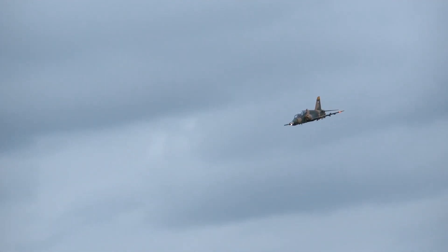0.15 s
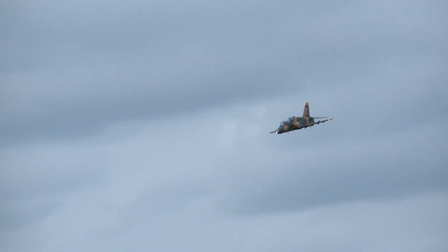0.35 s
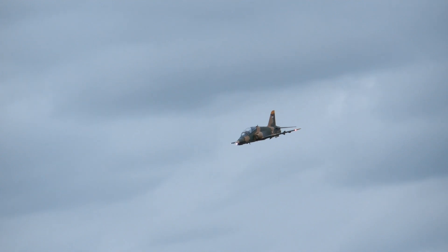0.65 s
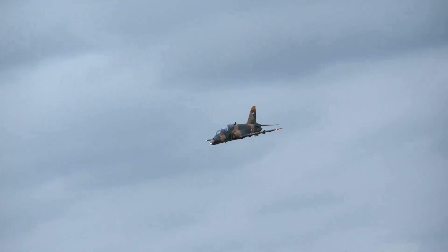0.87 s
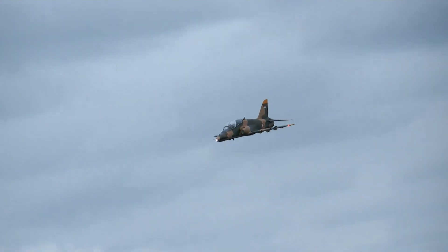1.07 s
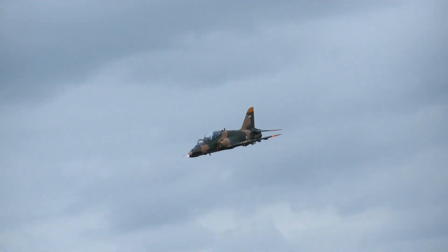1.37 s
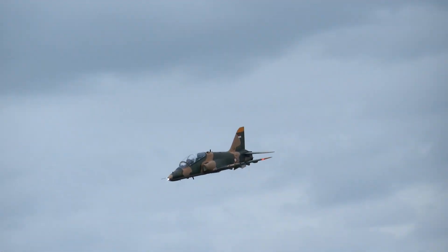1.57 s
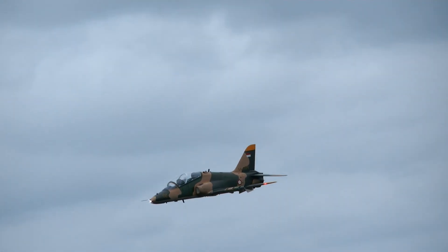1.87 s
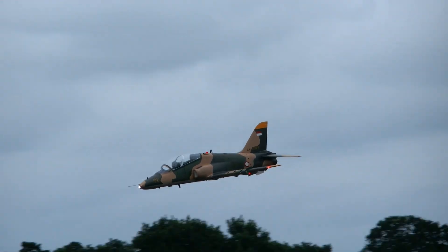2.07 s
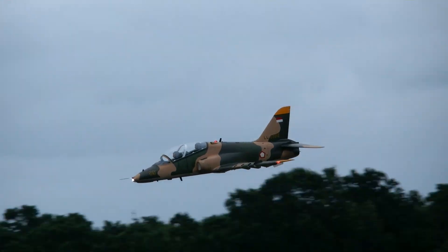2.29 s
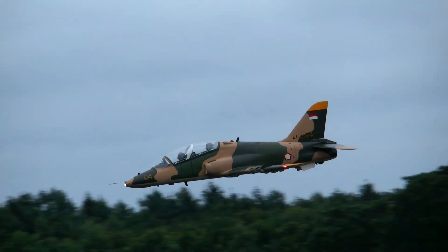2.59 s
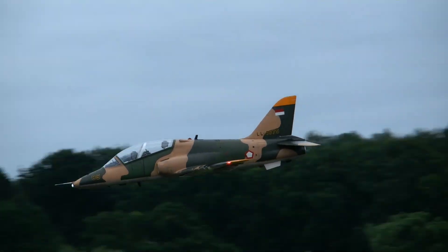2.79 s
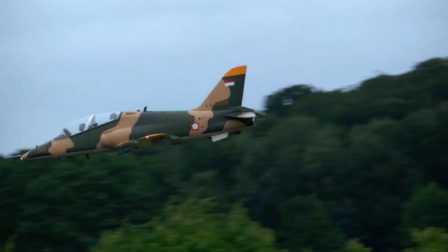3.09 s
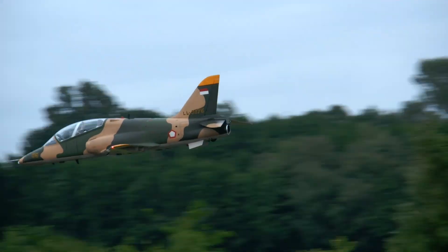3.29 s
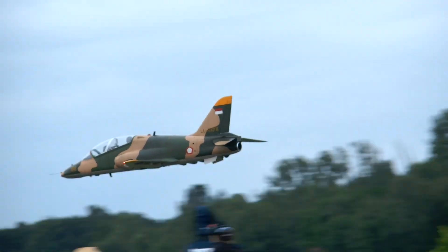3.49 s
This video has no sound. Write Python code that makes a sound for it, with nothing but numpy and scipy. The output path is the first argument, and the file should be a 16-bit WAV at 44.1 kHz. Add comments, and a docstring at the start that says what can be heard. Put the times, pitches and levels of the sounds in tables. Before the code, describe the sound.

A model jet flies toward the microphone across an open airfield. Its faint, distant roar grows louder and brighter, with surging hiss and a thin, high whine on top, over a low outdoor rumble.

```python
"""A faint, distant roar over a low rumble: a model turbine jet flies toward the microphone across an
open airfield and comes in low. As it closes in, the exhaust grows louder and brighter, its hiss
surging in the moving air, with a thin compressor whine on top. The echo off the grass sweeps a comb
through the noise, and surfaces beside the microphone cut steady dips in it."""
import sys
import numpy as np
from scipy import signal
from scipy.fft import rfft, irfft, next_fast_len
from scipy.io import wavfile
from scipy.ndimage import uniform_filter1d, map_coordinates

SR = 44100
rng = np.random.default_rng(int(sys.argv[2]) if len(sys.argv) > 2 else 0)


def inscribe(sig):
    """Save sig as 16-bit PCM at rate SR to the path in sys.argv[1].

    A 1-D sig is mono; a 2-D sig holds one channel per row.
    Samples are clipped to [-1, 1] before scaling.
    """
    pcm = np.round(np.clip(np.atleast_2d(sig).T, -1, 1) * 32767)
    wavfile.write(sys.argv[1], SR, pcm.astype(np.int16))


N = 160965

# colour of the exhaust (frequency [Hz], relative density [dB])
EXHAUST_SPECTRUM = [(100, -48), (250, -34), (420, -19), (500, -9.5), (580, 0), (720, 0), (1100, -2),
                    (1450, -1.5), (1900, -6), (2700, -6), (4100, -8.5), (6000, -12.5), (8000, -13),
                    (9500, -18), (12600, -24), (13500, -33), (14500, -42)]
# dips from surfaces beside the microphone (frequency [Hz], half-width [Hz], gain [dB])
SURFACE_DIPS = [(1664, 79, -5.5), (2239, 157, -10), (3116, 140, -8), (3690, 108, -11.5), (4505, 90, -7),
                (5130, 160, -4), (6000, 110, -4), (6610, 100, -6), (6830, 93, -14), (9050, 190, -5),
                (11360, 200, -3)]
# scattered sound against the direct sound (frequency [Hz], level [dB])
SCATTER_SPECTRUM = [(300, -44), (700, -22.5), (2000, -21), (4000, -16.5), (8000, -8), (14000, -23)]
def exhaust():
    """Turbulent jet noise reaches the microphone direct and scattered, through air and over grass."""
    def colour(hz):
        dips_db = sum(db * np.exp(-((hz - centre) / width) ** 2) for centre, width, db in SURFACE_DIPS)
        return amp(along(EXHAUST_SPECTRUM, hz) + dips_db)

    noise = unit(filtered(rng.standard_normal((2, N)), colour))
    frames = dict(nperseg=512, noverlap=384)
    hz, t, spectra = signal.stft(noise, SR, **frames)
    spectra = spectra * amp(approach_db(hz, t)) * ground_comb(hz, t)
    direct, scattered = signal.istft(spectra, SR, **frames)[1][:, :N]
    side = filtered(scattered, lambda f: amp(along(SCATTER_SPECTRUM, f)))
    return amp(-21) * np.array([direct + side, direct - side])


# the roar at the microphone, from far off to close (time [s], relative level [dB])
ROAR_LEVELS = [(0.0, -37.5), (0.31, -42), (0.52, -35), (0.76, -36.0), (1.2, -31), (1.34, -30),
               (1.57, -24.0), (1.65, -27), (1.78, -25.5), (1.86, -27.5), (1.91, -24), (2.07, -22.5),
               (2.17, -25.0), (2.41, -24), (2.44, -24.5), (2.62, -20.5), (2.85, -18.5), (3.06, -20),
               (3.22, -18), (3.43, -20), (3.46, -22), (3.54, -18.0), (3.59, -23.5), (3.64, -24.5)]
# the rush and the hiss above it (time [s], relative rush level [dB], relative hiss level [dB])
RUSH_HISS_LEVELS = [(0.0, -47.5, -64), (0.1, -50.0, -67), (0.21, -44, -58.5), (0.34, -47, -65),
                    (0.52, -38.5, -54.5), (0.6, -37.5, -51), (0.65, -45.5, -65), (0.73, -37.5, -52),
                    (0.79, -42, -56.5), (0.92, -34.5, -47.5), (1.05, -41.5, -58.5), (1.18, -37.0, -45),
                    (1.26, -35.5, -55), (1.34, -39, -47.5), (1.41, -34, -43), (1.62, -36, -43),
                    (1.68, -35.5, -48.5), (1.73, -31.5, -46.0), (1.81, -35.5, -40), (1.96, -33.5, -40),
                    (2.02, -27, -38), (2.09, -34, -39), (2.2, -29.0, -33), (2.25, -28.5, -36),
                    (2.36, -28, -26), (2.41, -26.5, -28), (2.46, -32, -38.0), (2.51, -31, -30.5),
                    (2.78, -26.5, -30.5), (2.83, -29.0, -37), (2.85, -23.5, -31.5), (2.91, -27.5, -36),
                    (2.99, -21.5, -28), (3.04, -21.5, -26.5), (3.09, -26.5, -33.5), (3.12, -25.5, -24.5),
                    (3.4, -21, -24), (3.43, -22, -27.5), (3.48, -18.5, -23.5), (3.54, -18, -29),
                    (3.59, -20, -21.0), (3.64, -22.5, -24.0)]
BANDS_HZ = [1020, 3400, 8060, 11800]  # roar, rush, hiss, top of the hiss
AIR_LOSS_DB_PER_S, AIR_CLEAR_S = 7.5, 3.55  # the top band's loss shrinks as the jet nears
FLUTTER_DB, HISS_FLUTTER_DB, PATCH_DB = 0.7, 1.84, 1.38  # in all bands, extra in the hiss, in patches
def approach_db(hz, t):
    """Gain by frequency and time: the nearer, the louder and brighter; turbulent air makes it flutter."""
    roar, rush, hiss = [relative(db) for db in curves(ROAR_LEVELS, t) + curves(RUSH_HISS_LEVELS, t)]
    flutter = HISS_FLUTTER_DB * wobble(t, rate=55)
    air_loss = AIR_LOSS_DB_PER_S * np.maximum(AIR_CLEAR_S - t, 0)
    levels = np.array([roar, rush + flutter / 2, hiss + flutter, hiss + flutter - air_loss])
    crossfades = np.array([along(list(zip(BANDS_HZ, row)), hz) for row in np.eye(len(BANDS_HZ))])
    patches = rng.standard_normal((len(hz), len(t)))
    patches = uniform_filter1d(patches, size=10, axis=0)
    patches = unit(uniform_filter1d(patches, size=16, axis=1))
    return crossfades.T @ levels + FLUTTER_DB * wobble(t, rate=32) + PATCH_DB * patches


# bounce off the grass between jet and microphone (time [s], delay [ms], strength [0-1], cutoff [Hz])
GROUND_ECHO = [(0, 0.28, 0.23, 2000), (2.3, 1, 0, 2000), (2.6, 0.69, 0.48, 2200), (2.75, 0.914, 0.18, 2400),
               (2.87, 0.93, .52, 2480), (3.15, 0.82, .3, 2780), (3.24, 0.64, 0.33, 4000),
               (3.31, 0.68, .5, 5970), (3.39, 0.645, 0.6, 7000), (3.45, 0.82, 0.6, 7000),
               (3.52, 0.77, 0.53, 7000), (3.6, 0.67, 0.33, 5960)]
SOFT_GROUND_RAD = 1.45
def ground_comb(hz, t):
    """The echo's delay shifts with the jet's height and distance; the grass swallows its treble."""
    delay_ms, strength, cutoff_hz = curves(GROUND_ECHO, t)
    echo = strength / np.sqrt(1 + (hz[:, None] / cutoff_hz) ** 4)
    lag = 2 * np.pi * hz[:, None] * delay_ms / 1000 + SOFT_GROUND_RAD
    return np.abs(1 + echo * np.exp(-1j * lag)) / np.sqrt(1 + echo ** 2)


# whine, beamed ahead and lost as the jet turns side-on to the microphone
# (time [s], pitch [Hz], level against the hiss curve [dB])
COMPRESSOR_WHINE = [(0, 12950, -30), (.6, 12830, -22), (1.15, 12700, -22), (1.5, 13900, -29),
                    (1.7, 13950, -23), (2.3, 13900, -12), (2.55, 13450, -25), (2.8, 13000, -12),
                    (3.05, 12950, -28), (3.3, 12800, -45)]
def compressor():
    """A blade tone smeared by turbulence, surging with the hiss."""
    t = np.arange(N) / SR
    pitch, level_db = curves(COMPRESSOR_WHINE, t)
    _, hiss_db = curves(RUSH_HISS_LEVELS, t)
    phase = 2 * np.pi * np.cumsum(pitch) / SR
    tone = unit(wobble(t, rate=260) * np.cos(phase) + wobble(t, rate=260) * np.sin(phase))
    return tone * amp(hiss_db + level_db)


# the jet's balance at the microphone (frequency [Hz], left minus right [dB])
LEFT_RIGHT_BALANCE = [(60, -1), (91, 0.5), (140, -4), (210, -0.5), (320, -5), (490, -1), (750, -2.0),
                      (1140, -2), (1730, -1.5), (2630, 0), (4000, -2.5), (6090, -0.5), (9280, -2.5),
                      (14100, 1)]
# its phase between the two ports (frequency [Hz], left lead [rad])
LEFT_RIGHT_PHASE = [(0, -0.37), (1640, 0.072), (3010, -0.42), (3530, 0.63), (4390, -0.73), (5170, 0.1),
                    (6630, -1.1), (6890, 0.54), (8350, -1.25), (9130, -0.075), (10600, -0.2), (10900, -2),
                    (11200, -0.0), (14300, -0.0)]
def microphone_ports(hz):
    """The jet reaches the left and right ports with slightly different level and phase."""
    half = np.array([[.5], [-.5]])
    return amp(half * along(LEFT_RIGHT_BALANCE, hz)) * np.exp(1j * half * along(LEFT_RIGHT_PHASE, hz))


# rumble around the microphone (time [s], relative level [dB])
RUMBLE_LEVELS = [(0.0, -56.5), (0.52, -57), (0.63, -51.5), (1.13, -52), (1.23, -56), (1.36, -54.5),
                 (2.04, -58.5), (2.7, -52.5), (3.01, -55.5), (3.09, -53), (3.25, -69), (3.46, -56),
                 (3.64, -57.5)]
# its colour (frequency [Hz], relative density [dB])
RUMBLE_SPECTRUM = [(40, -47), (80, -26), (120, -8.5), (180, 0.5), (300, -0.5), (500, 0.5), (1000, -6.5),
                   (3000, -13.5), (10000, -36)]
def field_rumble():
    """Wide, low noise from all over the airfield."""
    level_db, = curves(RUMBLE_LEVELS, np.arange(N) / SR)
    mid, side = noise_pair(RUMBLE_SPECTRUM)
    side = side * amp(-1)
    return amp(level_db + 7) * np.array([mid + side, mid - side])


# bass beneath the rumble (frequency [Hz], relative density [dB])
BASS_SPECTRUM = [(20, -14), (45, -12), (70, 2), (110, 4.5), (200, -13), (600, -60)]
BASS_START_DB, BASS_FADE_DB_PER_S, BASS_WOBBLE_DB = -63, 5.5, 2.5
def deep_bass():
    """A faint, uneven bass that fades away, different at each microphone port."""
    t = np.arange(N) / SR
    noise = noise_pair(BASS_SPECTRUM)
    return noise * amp(BASS_START_DB - BASS_FADE_DB_PER_S * t + BASS_WOBBLE_DB * wobble(t, rate=9.1))


def amp(db):
    """Decibels to gain."""
    return 10 ** (np.asarray(db) / 20)


def unit(x):
    """Scale to rms 1."""
    return x / np.sqrt(np.mean(x ** 2) + 1e-20)


def relative(db):
    """A level curve against its own mean power."""
    return db - 10 * np.log10(np.mean(amp(db) ** 2))


def along(points, hz):
    """Read (frequency, value) points at hz, on a log axis."""
    knots_hz, values = np.transpose(points)
    return np.interp(np.log(hz + 1), np.log(knots_hz + 1), values)


def curves(rows, t):
    """Each column after the time, read at times t."""
    times, *columns = np.transpose(rows)
    return [np.interp(t, times, column) for column in columns]


def wobble(t, rate):
    """A smooth random curve, rate knots a second."""
    return map_coordinates(rng.standard_normal(int(t[-1] * rate) + 4), [t * rate])


def filtered(x, response):
    """Pass x through a complex frequency response."""
    size = next_fast_len(N + SR // 2)
    hz = np.fft.rfftfreq(size, 1 / SR)
    return irfft(rfft(x, size) * response(hz), size)[..., :N]


def noise_pair(spectrum):
    """Two independent noises of one colour, at rms 1."""
    return unit(filtered(rng.standard_normal((2, N)), lambda hz: amp(along(spectrum, hz))))


def scene():
    """The jet, slightly right of the microphone, over the rumble of the field."""
    jet = filtered(exhaust() + compressor(), microphone_ports)
    return jet + field_rumble() + deep_bass()


def record(dry):
    """The camera at the microphone position keeps nothing above 14.6 kHz."""
    return filtered(dry, lambda hz: hz < 14600)


dry = scene()
out = record(dry)
inscribe(out)
```